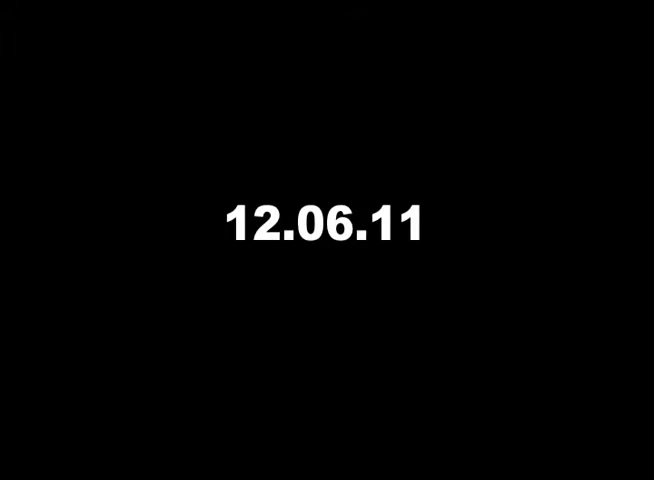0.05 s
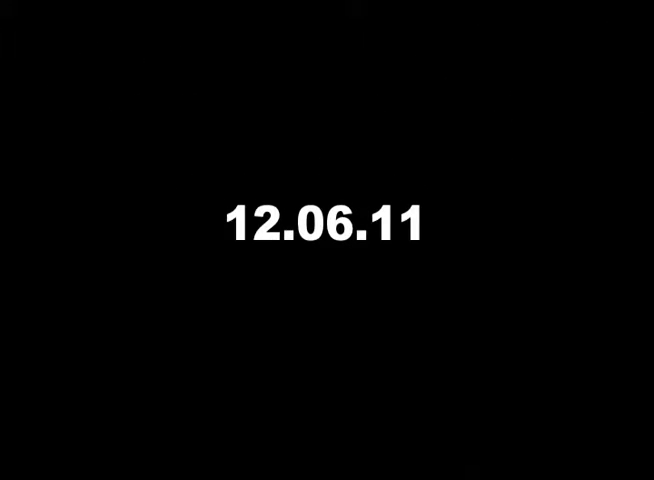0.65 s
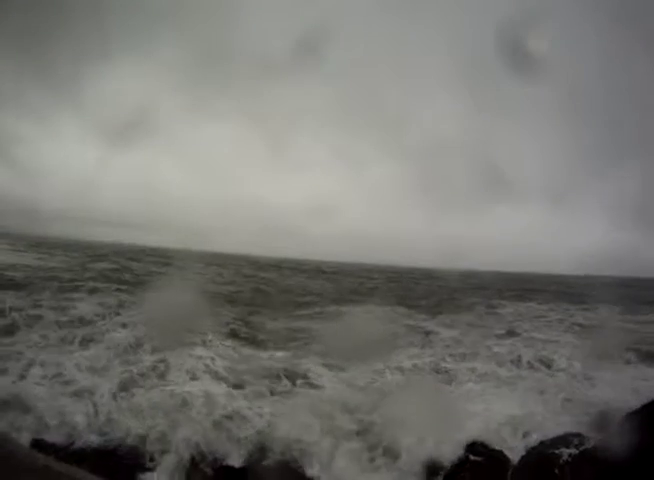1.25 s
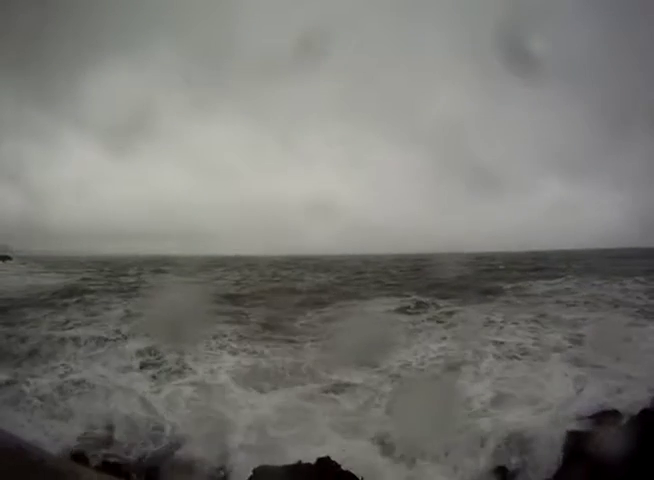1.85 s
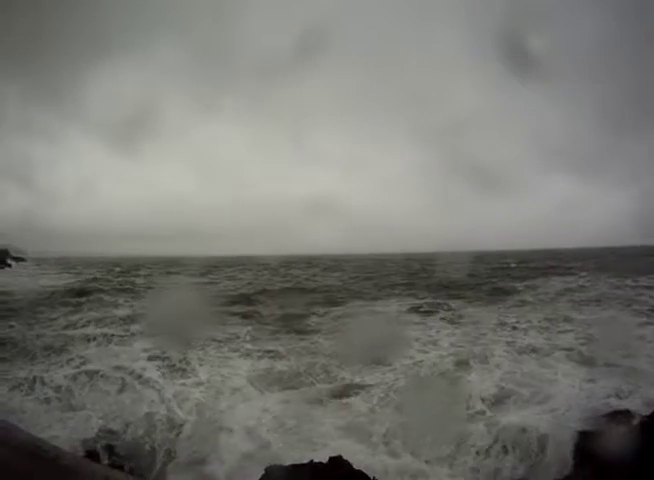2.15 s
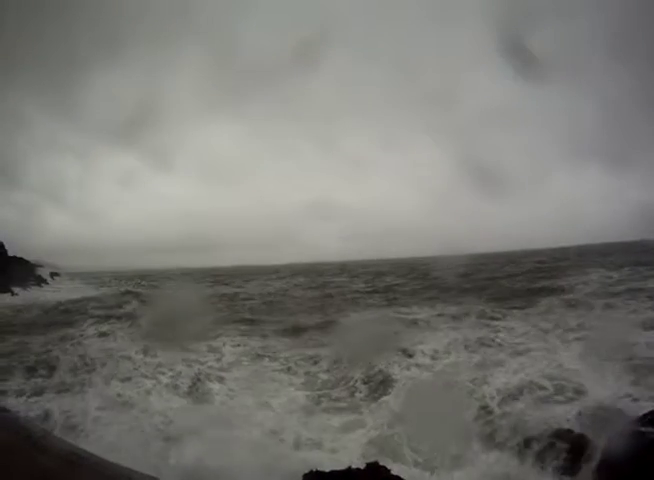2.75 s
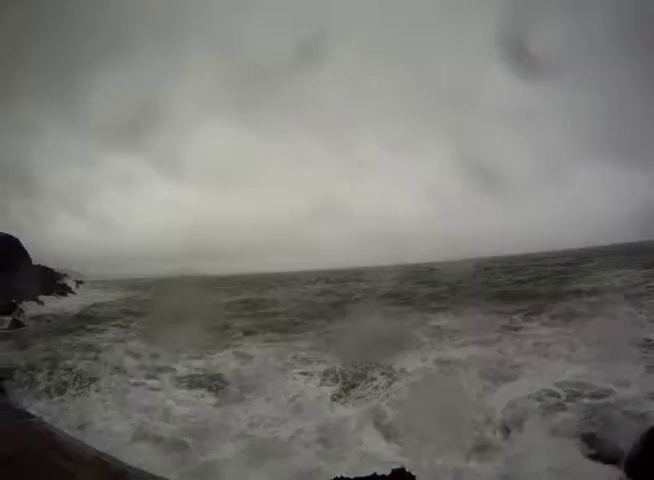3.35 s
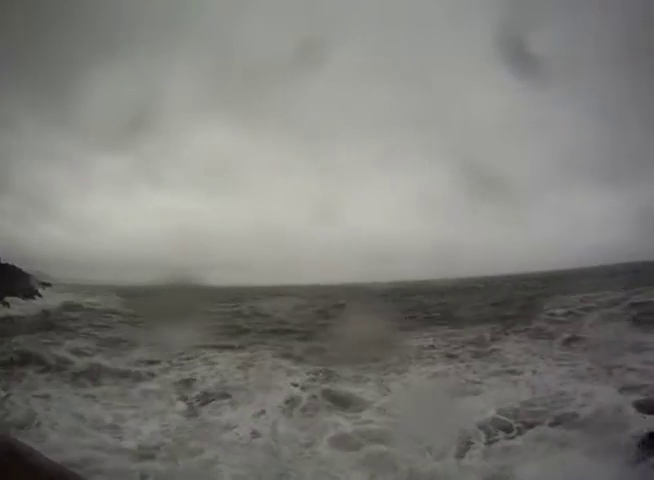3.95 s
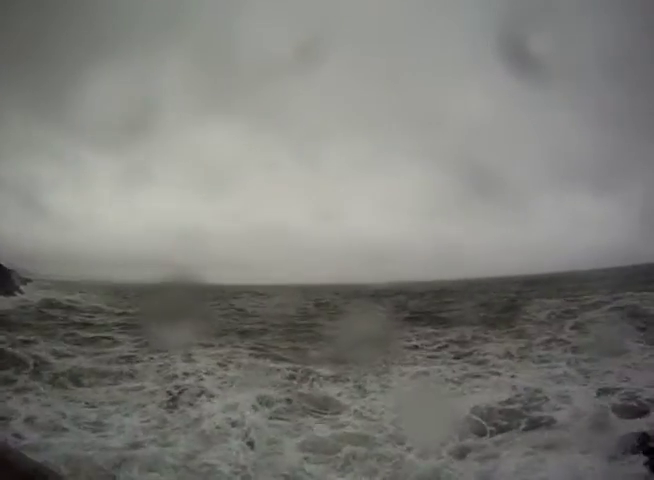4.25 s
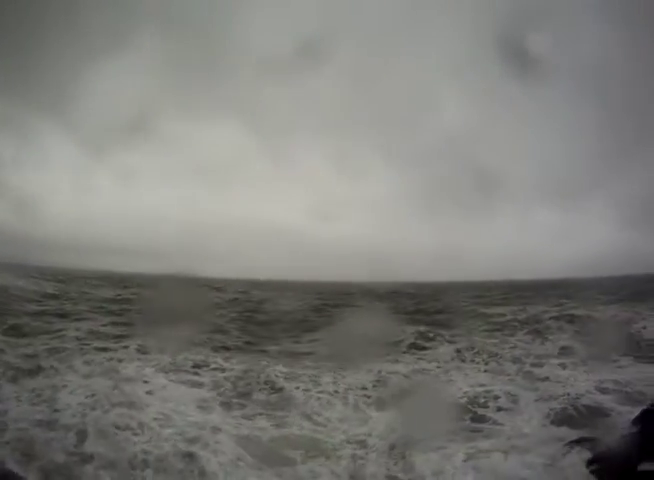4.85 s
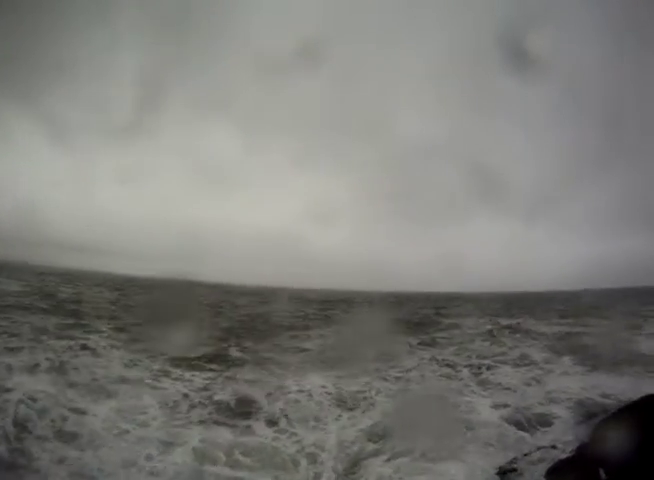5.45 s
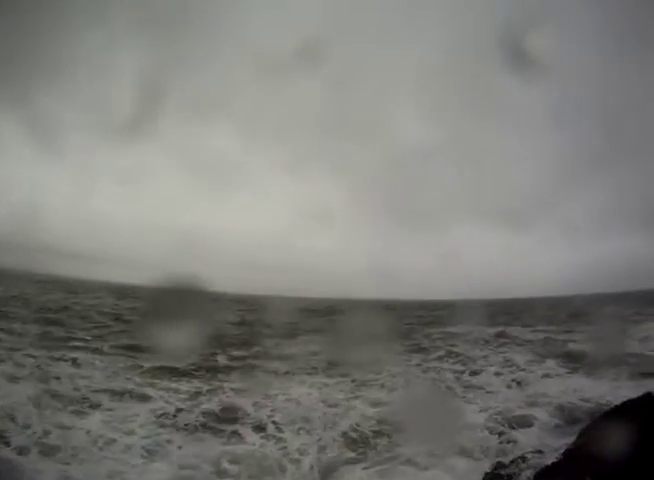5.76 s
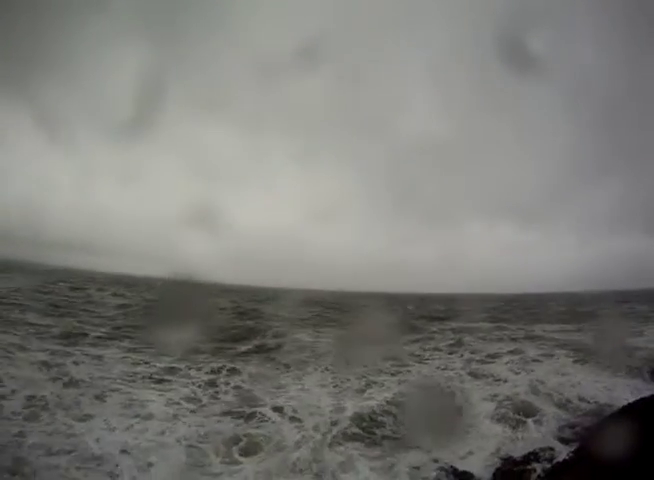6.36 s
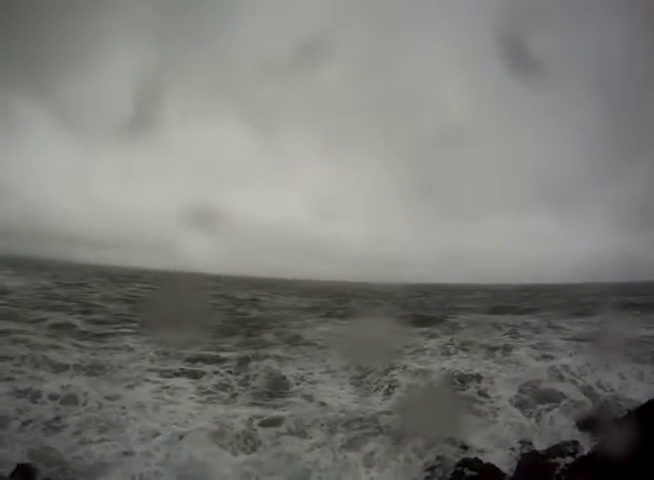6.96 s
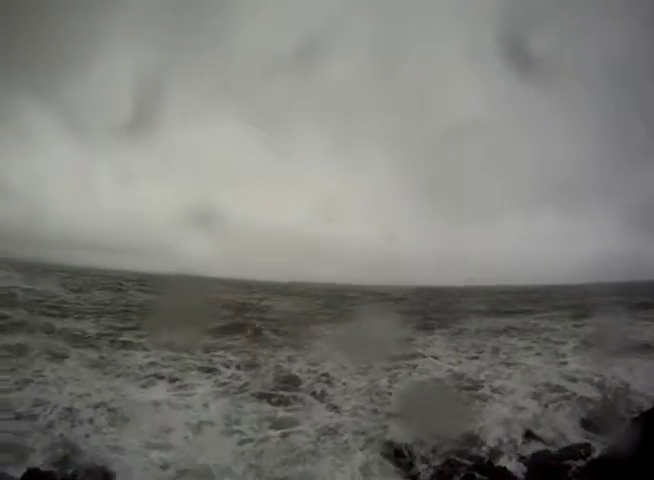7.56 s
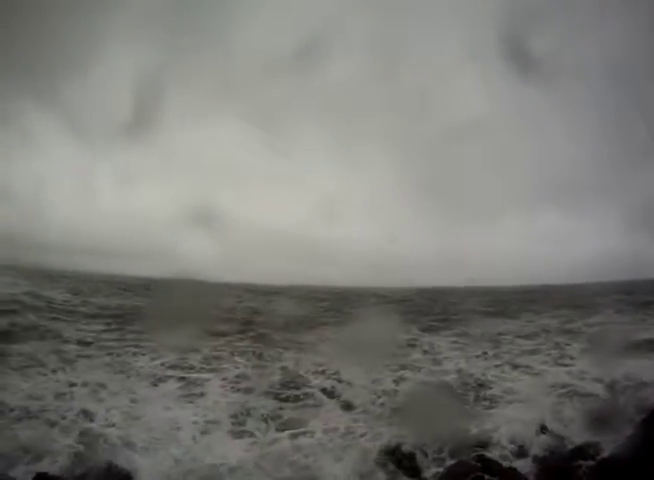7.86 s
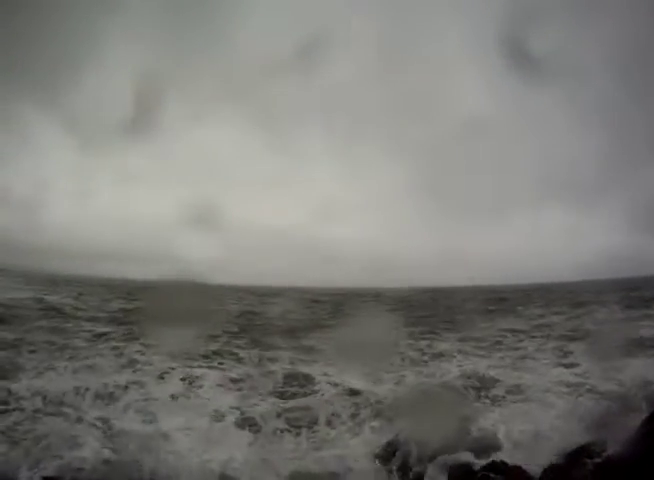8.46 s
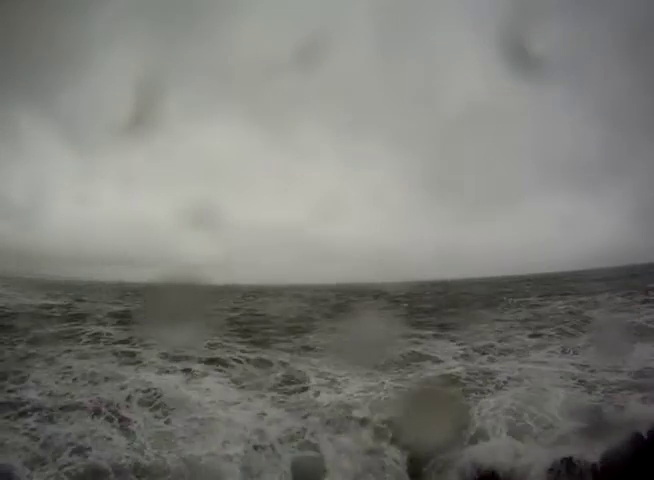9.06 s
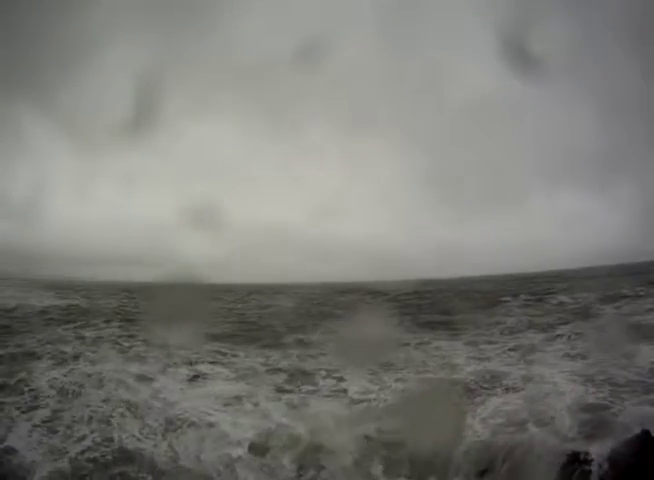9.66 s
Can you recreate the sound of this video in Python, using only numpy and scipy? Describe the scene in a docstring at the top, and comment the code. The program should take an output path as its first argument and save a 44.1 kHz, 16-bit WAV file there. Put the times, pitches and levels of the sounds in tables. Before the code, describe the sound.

After a brief silence, rough surf on rocks cuts in, sounding boxy from inside a hand-held camera's waterproof case. The case gives a quick double clack almost at once. Wind rumbles underneath while drops of spray tick sharply on the shell, one much louder than the rest, and the grip makes occasional dull bumps. The wash eases slightly midway, then builds with the next wave.

```python
"""Rough surf on rocks cuts in after a short silence, heard from inside a camera's waterproof housing.
The shell's resonances colour the roar and fizz, wind rumbles around it and fine spray patters on it.
Almost at once the hand-held case clacks twice, and the grip bumps it dully now and then.
Drops of spray tick on the shell while the wash ebbs and builds again with the next wave."""
import sys
import numpy as np
from scipy import signal
from scipy.fft import rfft, irfft
from scipy.io import wavfile
from scipy.ndimage import uniform_filter1d

SR = 44100
rng = np.random.default_rng(int(sys.argv[2]) if len(sys.argv) > 2 else 0)


def transcribe(signal):
    """Save signal, clipped to [-1, 1], as a 16-bit WAV file at the path in sys.argv[1]."""
    frames = np.atleast_2d(signal).T
    limited = np.clip(frames, -1, 1)
    pcm = np.round(limited * 32767).astype(np.int16)
    wavfile.write(sys.argv[1], SR, pcm)


N = 428652
TIME = np.arange(N) / SR
FFT_SIZE = 2048
FREQ = np.arange(FFT_SIZE // 2 + 1) * SR / FFT_SIZE


def undb(db):
    """Decibels to gain."""
    return 10 ** (np.asarray(db) / 20)


def unit(x):
    """Scale to rms 1."""
    return x / np.sqrt(np.mean(x ** 2))


def fader(points):
    """A level ride in dB: straight lines between (seconds, dB) points."""
    seconds, db = np.transpose(points)
    return np.interp(TIME, seconds, db)


def eq(points):
    """Gain at each frequency from (Hz, dB) points."""
    hz, db = np.transpose(points)
    return undb(np.interp(np.log(FREQ + 1), np.log(hz), db))


def bell(hz, width):
    """A resonance with gain 1 at its centre and one half at `width` Hz to either side."""
    return 1 / (1 + ((FREQ - hz) / width) ** 2)


def treble(hz):
    """A shelf that rises from 0 to 1 around a frequency."""
    return 1 - 1 / (1 + (FREQ / hz) ** 4)


def through(x, gain):
    """Filter by a gain at each frequency; minimum phase, so nothing rings ahead of a hit."""
    cepstrum = irfft(np.log(gain + 1e-7))
    cepstrum[1:FFT_SIZE // 2] *= 2
    cepstrum[FFT_SIZE // 2 + 1:] = 0
    impulse_response = irfft(np.exp(rfft(cepstrum)))
    return signal.oaconvolve(x, impulse_response)[:len(x)]


def wander(per_s):
    """Smooth random modulation at rms 1: held steps, slewed twice."""
    hold = int(SR / per_s)
    steps = np.repeat(rng.standard_normal(N // hold + 1), hold)
    return unit(uniform_filter1d(uniform_filter1d(steps, hold), hold)[:N])


def crackle(per_s, spread_db):
    """Random impulses, many small and a few large."""
    hits = rng.random(N) < per_s / SR
    size = np.minimum(rng.exponential(size=N), 5)
    return unit(hits * undb(spread_db * size) * rng.choice([-1, 1], N))


def add(out, start_s, sound):
    """Mix a sound in at a time."""
    i = int(start_s * SR)
    out[i:i + len(sound)] += sound[:len(out) - i]


# The housing's resonances. Each row: centre in Hz, half-width in Hz, relative level in dB.
SHELL_MODES = [(335, 440, -8), (950, 214, -10), (1272, 150, -4), (1957, 121, -1), (2229, 141, 0.9),
               (2610, 360, -4.5), (2900, 390, -11), (3587, 247, -3), (3956, 230, -9.5), (4690, 420, -12.5),
               (5297, 255, -11), (6656, 266, -13), (7250, 340, -14.5), (7990, 240, -14.5), (8400, 257, -9),
               (9280, 360, -13.5), (9740, 157, -9.5), (10020, 114, -14), (10730, 210, -22),
               (13230, 280, -26.5), (14120, 260, -13.5), (14840, 520, -18.5)]
def shell(drives_db):
    """The boxy tone of the housing, each resonance driven more or less strongly."""
    modes = [undb(db + drive_db) * bell(hz, width)
             for (hz, width, db), drive_db in zip(SHELL_MODES, drives_db)]
    return np.sqrt(sum(mode ** 2 for mode in modes))


# The wash ebbs, then builds with the next wave. Each row: time in seconds, relative level in dB.
WASH_RIDE = [(0.92, -49), (2.0, -49.2), (2.9, -50), (4.7, -53), (6.8, -51.5), (8.15, -50.5), (9.2, -47.4),
             (9.7, -49.6)]
def surf(housing, roar_db=1.5, foam_db=-57, foam_growth=1.16, bubbles_db=-6):
    """Churning water roars and bursting foam fizzes; each band also flickers a little on its own."""
    wash_db = fader(WASH_RIDE)
    fizz_db = foam_db + foam_growth * (wash_db - wash_db.mean())
    churn_db = 0.3 * wander(per_s=7)

    def water(share):
        grains = rng.standard_normal(N) + undb(bubbles_db) * crackle(per_s=1500, spread_db=3)
        flicker_db = 0.5 * wander(per_s=22)
        return through(grains * undb(churn_db + flicker_db), housing * np.sqrt(share))

    deep_share, foam_share = 1 - treble(hz=1700), treble(hz=5640)
    roar = sum(water(share * (1 - foam_share)) for share in (deep_share, 1 - deep_share))
    foam = water(foam_share)
    return unit(roar) * undb(wash_db + roar_db) + unit(foam) * undb(fizz_db)


# The gusts. Each row: time in seconds, relative level in dB.
WIND_RIDE = [(0.95, -54.5), (1.55, -58.5), (2.1, -54), (2.5, -57), (5.6, -59), (6.45, -56.5), (7.5, -61.5),
             (9.1, -57.5), (9.6, -53.5)]
# The wind's bass-heavy tone. Each row: frequency in Hz, gain in dB.
WIND_EQ = [(12, -23), (25, -7), (45, 0.5), (70, 0.5), (110, -1.5), (170, -5), (250, -9.5), (400, -33),
           (800, -38)]
def wind(trim_db=1, buffet_db=2.6):
    """Eddies buffet the shell and make it rumble unevenly."""
    eddies = rng.standard_normal(N) * undb(buffet_db * wander(per_s=34))
    rumble = through(eddies, eq(WIND_EQ))
    return unit(rumble) * undb(fader(WIND_RIDE) + trim_db)


# How any drop drives the shell, relative to airborne sound. Each row: frequency in Hz, gain in dB.
SPRAY_EQ = [(300, -16), (550, -8.5), (950, -1), (1300, -5), (1650, 5), (1950, -4.5), (2500, 0),
            (5100, -1.5), (6000, -11), (7000, -4.5), (9500, 0), (11000, 1), (12000, -11), (14500, 0.5)]
def mist(housing, trim_db=-14, ring_db=9):
    """Fine spray patters faintly on the shell, louder when the wash is strong."""
    tone = housing * eq(SPRAY_EQ) * undb(ring_db * bell(hz=2200, width=450))
    patter = through(crackle(per_s=40, spread_db=2), tone)
    return unit(patter) * undb(fader(WASH_RIDE) + trim_db)


def impact(tone, db, splat, splat_s=0.0015, bass_delay_s=0.0004):
    """One contact rings the shell: a push, then a short sizzle as the contact spreads."""
    t = TIME[:FFT_SIZE]
    sizzle = rng.standard_normal(FFT_SIZE) * np.exp(-t / splat_s)
    force = splat * through(sizzle, 0.2 + treble(hz=4040))
    force[0] += 1  # the push
    # bending waves bring the treble first and the lows a moment later
    delay_s = bass_delay_s / np.sqrt(1 + FREQ / 1500)
    phase_lag = 2 * np.pi * np.cumsum(delay_s) * SR / FFT_SIZE
    tick = irfft(rfft(through(force, tone)) * np.exp(-1j * phase_lag))
    # the push returns once from the far wall of the shell
    tick = tick + 0.17 * np.interp(t - 0.00085, t, tick, left=0)
    attack = tick[:SR // 200]  # the first 5 ms set the level
    return tick * undb(db) / np.sqrt(np.mean(attack ** 2))


# Hard knocks of the hand on the case. Each row: start in seconds, attack level in dB.
KNOCK_CUES = [(0.8279, -24.5), (0.8453, -21.5)]
# A knock's tone, relative to airborne sound. Each row: frequency in Hz, gain in dB.
KNOCK_EQ = [(300, -8), (520, -20), (720, 5), (950, 1.5), (1300, -2), (1650, 12.5), (2500, -5), (3600, 2.5),
            (5100, -14), (7000, -14), (8400, -0.5), (11000, 2), (14500, -1)]
def knocks(housing):
    """A quick double clack of the case as it is handled."""
    out = np.zeros(N)
    for start_s, db in KNOCK_CUES:
        add(out, start_s, impact(housing * eq(KNOCK_EQ), db, splat=0.067))
    return out


# Bumps of the grip. Each row: start in seconds, relative peak level in dB, settled pitch in Hz.
BUMP_CUES = [(.8310, -23.5, 119), (0.8454, -27.5, 199), (.8490, -26, 101), (1.1048, -36, 96),
             (1.9626, -33, 99), (2.1875, -38, 120), (4.5390, -32.5, 96), (4.5780, -31, 98),
             (4.8567, -29.5, 86), (5.342, -30, 86), (5.962, -29.5, 84), (6.4514, -30.5, 88),
             (6.491, -35, 105), (6.5760, -28.3, 84), (8.7860, -39, 88), (8.8520, -37.5, 90)]
def bumps(trim_db=-1.5, stiffen=0.65, settle_s=0.0022, contact_s=0.0011, ring_cycles=3.9):
    """The camera rocks in its case: a dull thump, stiffer and so higher at first contact."""
    out, t = np.zeros(N), TIME[:2 * FFT_SIZE]
    for start_s, db, hz in BUMP_CUES:
        pitch_hz = hz * (1 + stiffen * np.exp(-t / settle_s))
        phase = 2 * np.pi * np.cumsum(pitch_hz) / SR
        decay = undb(-60 * t * hz / ring_cycles)
        envelope = (1 - np.exp(-t / contact_s)) * decay
        add(out, start_s, -undb(db + trim_db) * envelope / envelope.max() * np.sin(phase))
    return out


def drop(db, ring_hz, thud_db, hollow_db, landing_spread_db=0.6):
    """One drop ticks on the shell; where it lands shifts the balance of the resonances."""
    tone = shell(landing_spread_db * rng.standard_normal(len(SHELL_MODES))) * eq(SPRAY_EQ)
    lows_db = thud_db * (1 - treble(hz=840)) + hollow_db * bell(hz=1326, width=390)
    # a heavier thud rings harder and brighter
    ring_db = (11 + 0.33 * thud_db) * bell(ring_hz, width=420)
    bright_db = (2.8 + 0.2 * thud_db) * treble(hz=5430)
    return impact(tone * undb(lows_db + ring_db + bright_db), db, splat=0.18)


# Large drops on the shell. Each row: start in seconds, attack level in dB, main ring in Hz,
# thud boost in dB, hollow low ring boost in dB.
DROP_CUES = [(1.2017, -27.5, 2540, 13, 2), (1.2961, -26.5, 2550, 12, 6.5), (1.3837, -36.5, 2300, 13, -5),
             (1.8138, -39.5, 1810, 17, -2), (1.989, -27, 2480, 18, 7.5), (2.1989, -36.5, 2280, -1, 3),
             (2.319, -43, 2600, 13, 3), (2.6547, -36, 2000, -1, 3), (2.7191, -33, 2290, 4, 1),
             (2.8199, -36.5, 3800, -18, 3), (2.9013, -37.5, 2140, 4, -1), (3.5005, -13.5, 2400, -19, 13),
             (3.6966, -29.5, 2140, -12, 5), (4.0699, -41, 1550, -8, 8), (4.1416, -35.5, 2130, 2, 5),
             (4.685, -43, 2140, 6, 0), (4.8282, -30, 3620, -4, 11), (5.1224, -39.5, 2590, 13, 8),
             (5.336, -35.5, 2130, 12, -2), (5.4187, -43.5, 2100, 3, 8), (5.47, -41.5, 2600, 3, 7),
             (5.566, -37.5, 2000, 7, -1), (5.5872, -40.5, 2000, 7, 6), (5.8512, -40.5, 3600, 3, 0),
             (6.297, -43, 2150, 0, 1), (7.067, -33.5, 3120, -16, 6.5), (7.193, -35.5, 2120, 7, 1),
             (7.451, -28.5, 2400, -1, 16.5), (7.831, -36, 2000, 4, 0), (7.8826, -43, 3600, -8, -1),
             (8.123, -28, 3700, -2, 16.5), (8.696, -29.5, 2620, 16, 13.5)]
def large_drops():
    """Large drops of spray hit the shell, each a sharp tick."""
    out = np.zeros(N)
    for start_s, db, ring_hz, thud_db, hollow_db in DROP_CUES:
        add(out, start_s, drop(db, ring_hz, thud_db, hollow_db))
    return out


def drizzle(per_s=1.2, attack_db=-47.5, centre_hz=2150, spread_octaves=0.25):
    """Small drops tick softly at random moments and places on the shell."""
    out = np.zeros(N)
    for _ in range(int(per_s * N / SR)):
        start_s = rng.uniform(0, TIME[-1])
        ring_hz = centre_hz * 2 ** (spread_octaves * rng.standard_normal())
        add(out, start_s, drop(attack_db, ring_hz, thud_db=6, hollow_db=5))
    return out


def scene():
    """Sea, wind, spray and handling, mixed in mono inside the housing."""
    housing = shell(drives_db=np.zeros(len(SHELL_MODES)))
    mix = surf(housing) + wind() + large_drops() + mist(housing) + knocks(housing) + bumps() + drizzle()
    return mix[None]


def record(dry, start_s=0.719, fade_s=0.0023, top_hz=15400):
    """The sound cuts in abruptly, and a steep low-pass takes off the very top."""
    gate = np.clip((TIME - start_s) / fade_s, 0, 1)
    low_pass = signal.ellip(10, 0.2, 80, top_hz, fs=SR, output="sos")
    return signal.sosfilt(low_pass, dry * gate)


dry = scene()
out = record(dry)
transcribe(out)
```